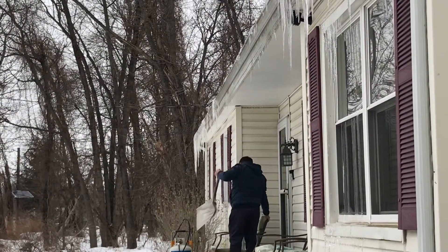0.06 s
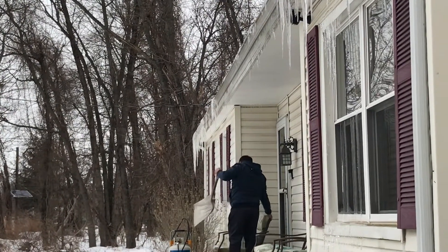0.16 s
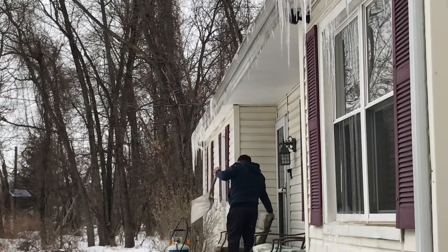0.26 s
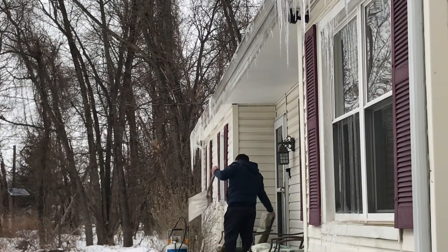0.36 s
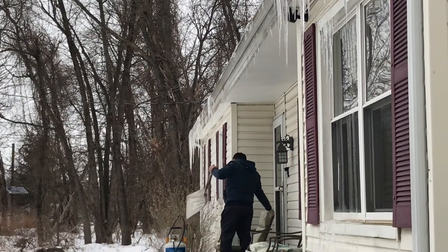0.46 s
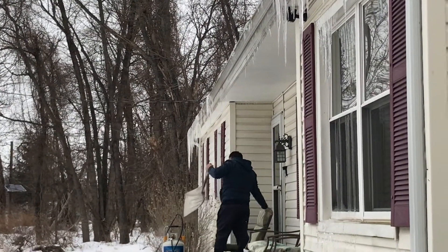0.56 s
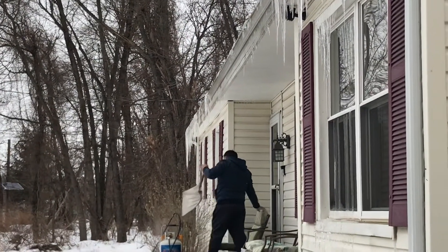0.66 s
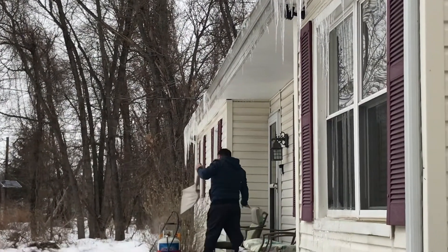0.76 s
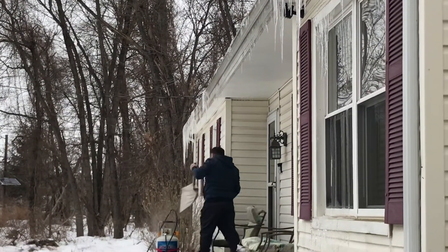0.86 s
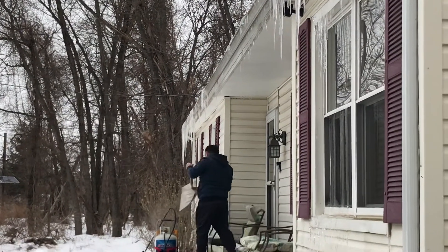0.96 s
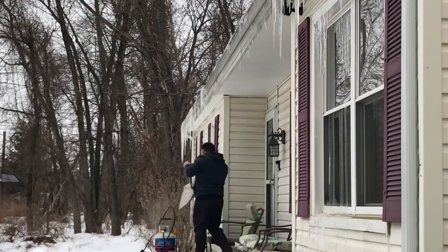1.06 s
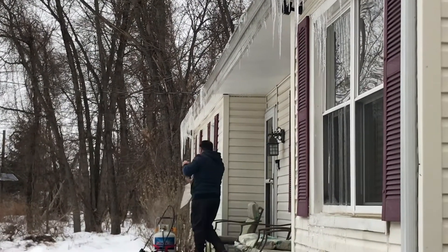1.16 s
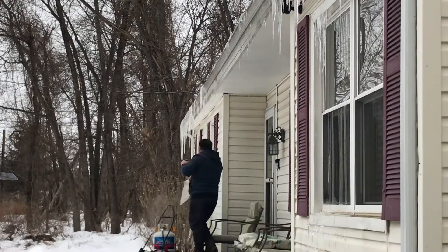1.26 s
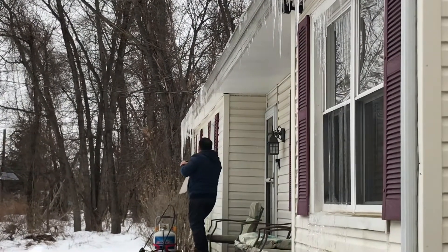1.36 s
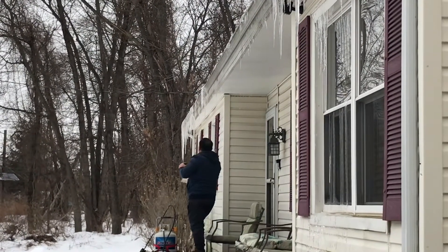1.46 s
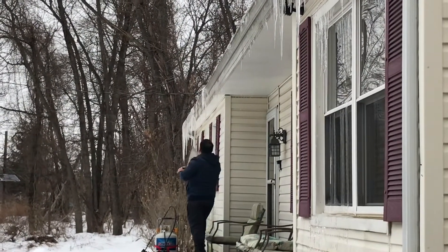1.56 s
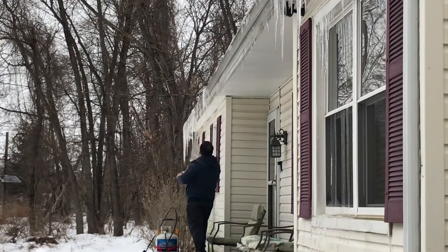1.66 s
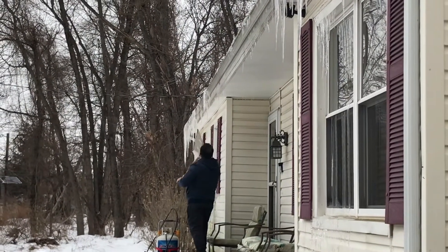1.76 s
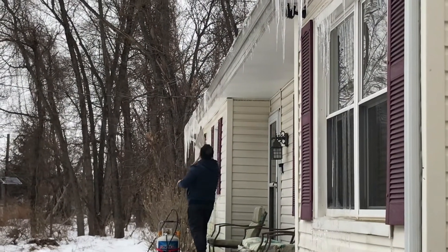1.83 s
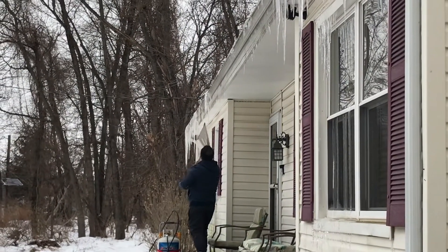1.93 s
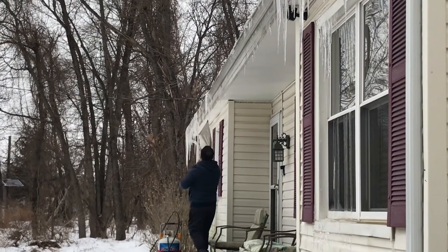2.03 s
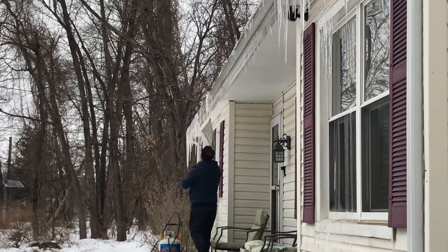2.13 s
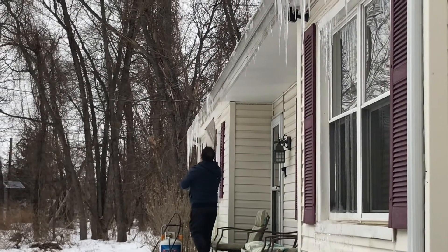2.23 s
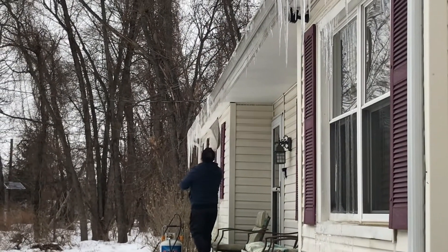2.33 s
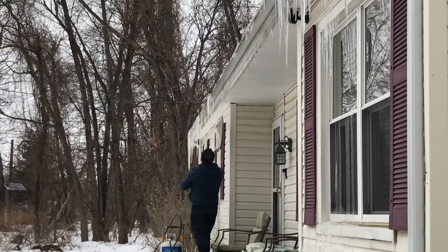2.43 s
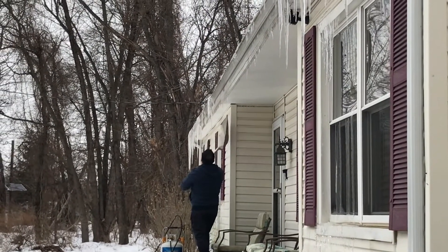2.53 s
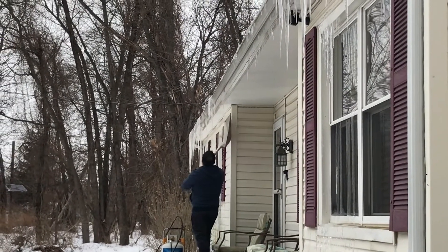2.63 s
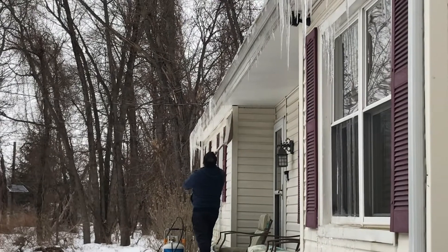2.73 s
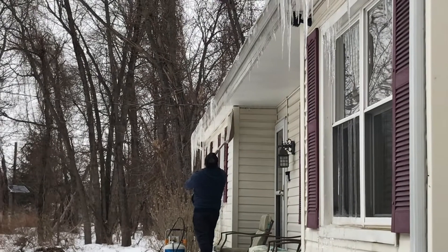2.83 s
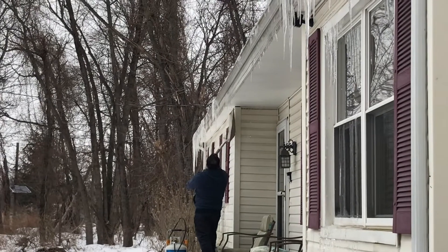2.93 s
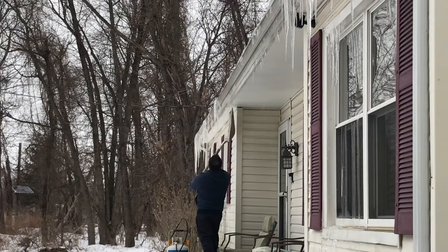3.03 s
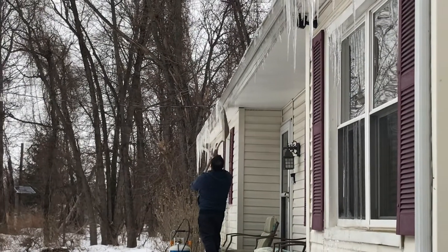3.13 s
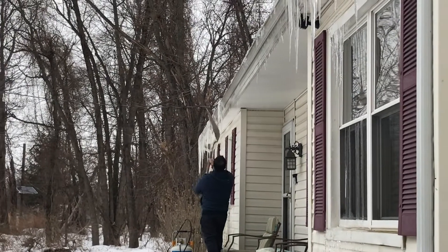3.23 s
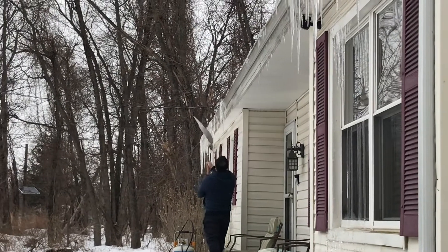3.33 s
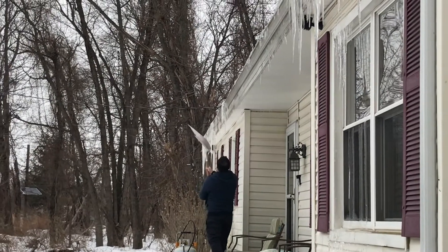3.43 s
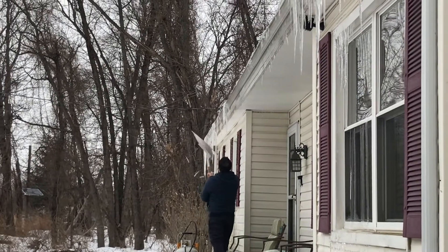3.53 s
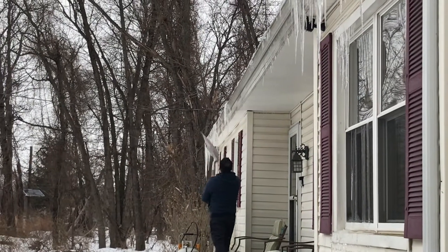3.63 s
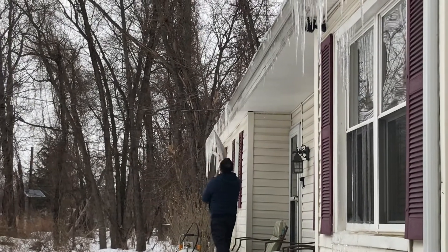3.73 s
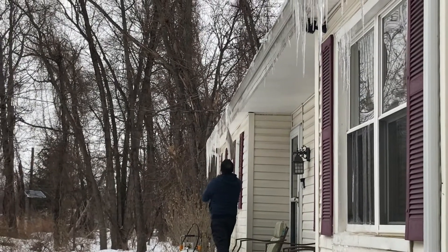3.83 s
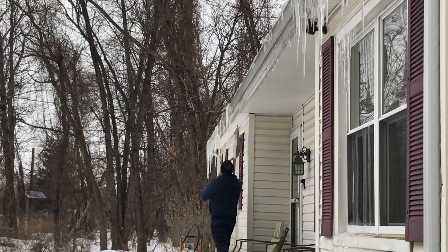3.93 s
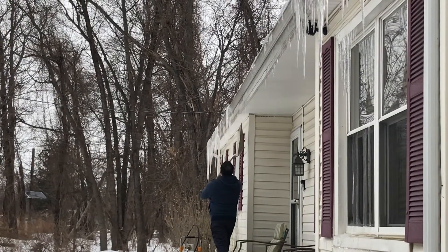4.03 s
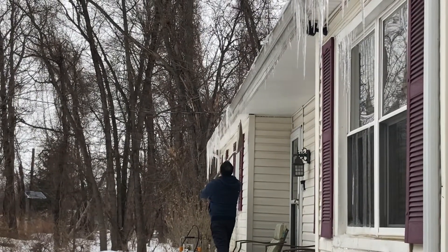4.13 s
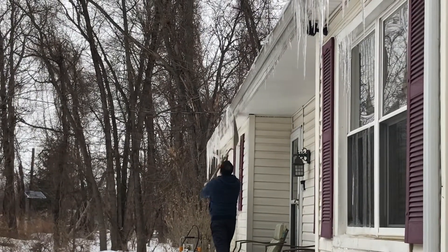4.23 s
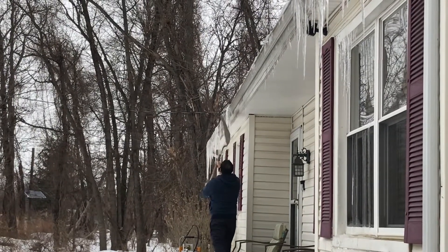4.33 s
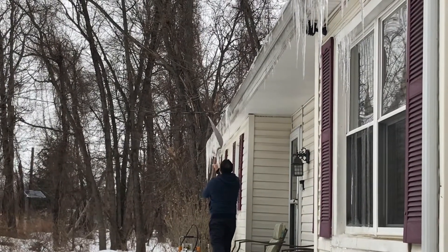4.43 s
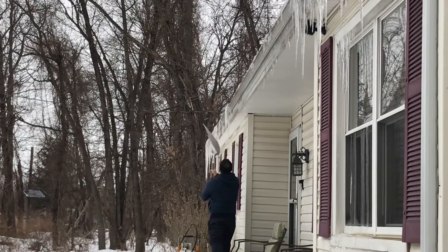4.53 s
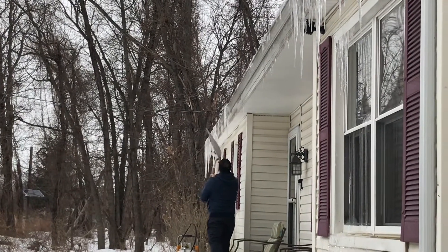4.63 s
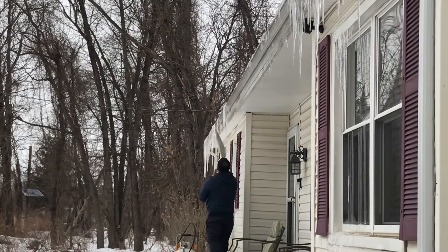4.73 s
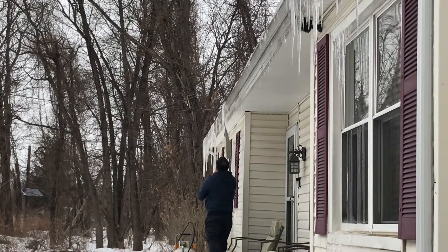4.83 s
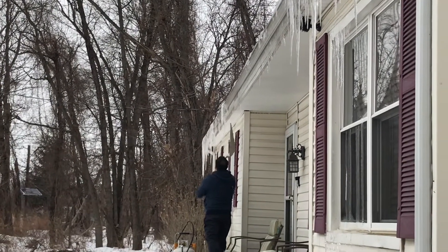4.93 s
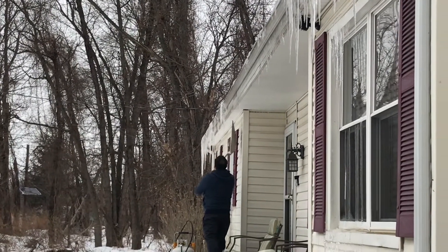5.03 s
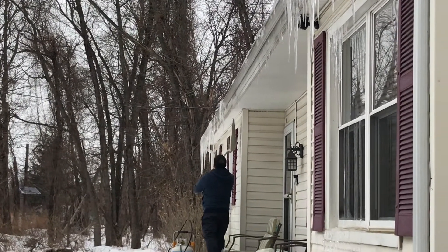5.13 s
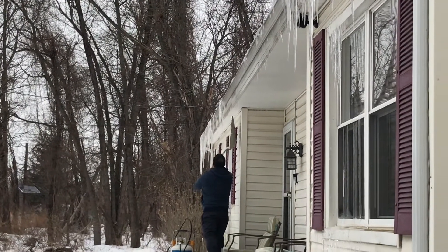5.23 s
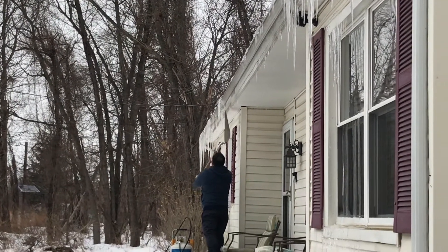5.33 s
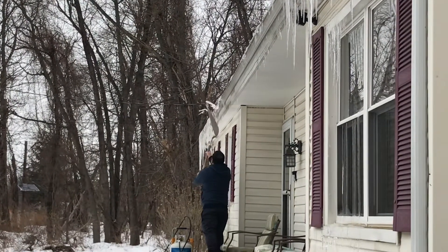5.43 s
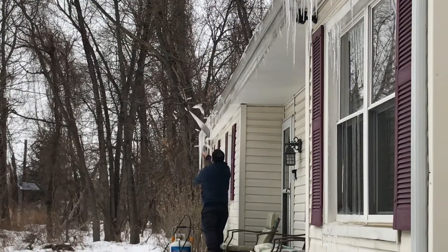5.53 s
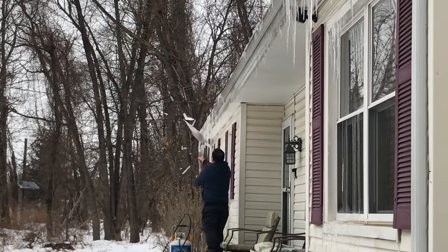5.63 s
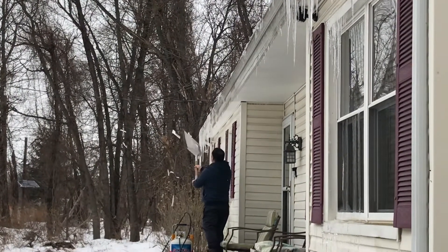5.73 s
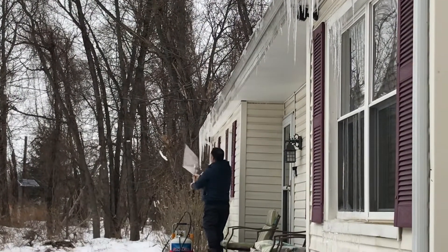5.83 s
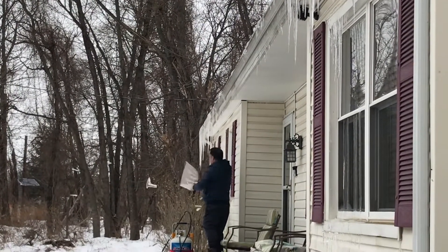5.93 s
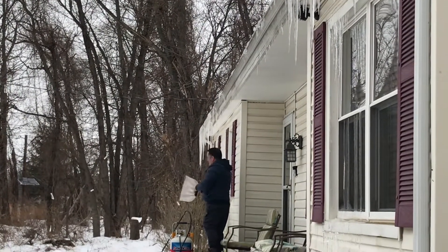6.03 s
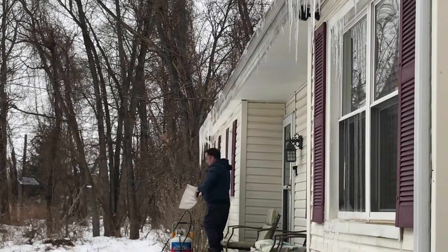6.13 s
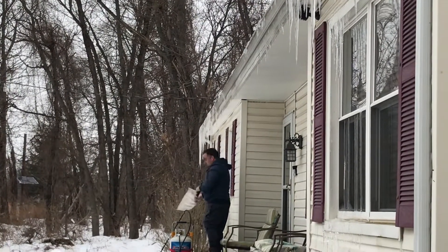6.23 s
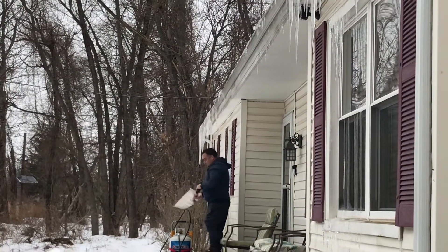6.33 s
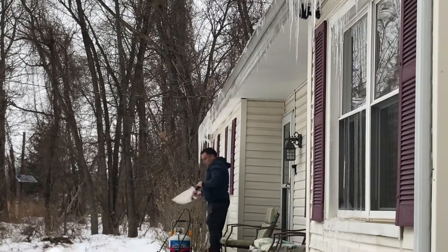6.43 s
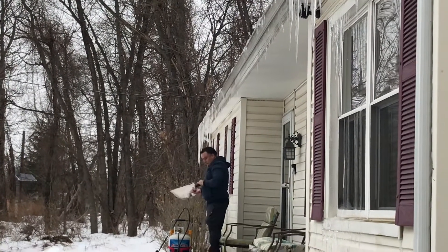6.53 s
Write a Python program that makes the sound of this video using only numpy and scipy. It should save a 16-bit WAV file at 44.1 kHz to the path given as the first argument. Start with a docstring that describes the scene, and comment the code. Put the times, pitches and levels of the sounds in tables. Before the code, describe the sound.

Handling rumble and gritty rubbing open the scene and stop quickly. Low air, faint distant road hum and tiny ice ticks remain. Some metres away, a shovel blade clanks against a gutter three times over about two seconds, snapping brittle icicles. The final sharp crash sends pieces tinkling and scattering, thinning to small clicks and crumbs. Single-channel outdoor pickup with slight reflections from the house wall.

```python
"""Something scuffs close to the microphone, then lets go: rough noise bands, crunches and squeaks.
Small cracks tick in the winter yard: short, sharp bursts of grainy noise.
A shovel strikes the eave three times: icicles snap as noise bursts with ringing rods, blade and gutter modes ring.
After the last strike shards clatter down, glancing off the blade in a shower of crumbs; the porch answers briefly.
Throughout, low yard air and a distant road hum as slowly wavering coloured noise."""
import sys
import numpy as np
from scipy import signal
from scipy.fft import rfft, irfft, next_fast_len
from scipy.io import wavfile
from scipy.ndimage import map_coordinates

SR = 44100
rng = np.random.default_rng(int(sys.argv[2]) if len(sys.argv) > 2 else 0)


def waveform_to_disk(signal):
    """Save audio, clipped to [-1, 1], as 16-bit WAV at the path in sys.argv[1]."""
    frames = np.transpose(np.atleast_2d(signal))
    scaled = np.clip(frames, -1, 1) * 32767
    samples = np.round(scaled).astype(np.int16)
    wavfile.write(sys.argv[1], SR, samples)


N = 289735  # length [samples]

# The shovel strikes the eave: (time [s], blade ring [dB], gutter ring [dB], gutter t60 [s])
STRIKES = [(3.022, -31, -38, 1.33), (4.206, -38.5, -46.5, 0.93), (5.326, -24, -29, 0.69)]
# Modes of the shovel blade: (frequency [Hz], relative level [dB], t60 [s])
BLADE_MODES = [(234, -14, 0.097), (296, -27.5, 0.51), (639, -21, 0.69), (752, -22.5, 0.74),
               (866, -14.5, 0.44), (932, -7, 0.24), (1056, -9, 0.4), (1078, -15, 0.23), (1316, -6, 0.33),
               (1416, -6, 0.29), (1546, -3.5, 0.33), (1613, -19, 0.42), (1886, -7.5, 0.19),
               (2000, -22, 0.19), (2300, -1, 0.21), (2493, 0.5, 0.25), (2735, -7, 0.29), (2570, -14, 0.21),
               (3250, -9.5, 0.16), (3210, -1.5, 0.15), (3470, -12.5, 0.17), (3880, -8, 0.16),
               (4070, -5, 0.18), (4870, -24, 0.093), (6540, 1, 0.1)]
# Modes of the gutter: (frequency [Hz], relative level [dB], multiplier on the strike's gutter t60 [ratio])
GUTTER_MODES = [(733, -16.5, 1.3), (1092, 0, 1.05)]

# Icicles snap off:
# (time [s], crack level [dB], centre [Hz], crumble t60 [s], rod pitch [Hz], rod ring [dB])
BREAKS = [(3.015, -24, 1930, 0.092, 2544, -24.5), (3.022, -20.5, 2170, 0.067, 2563, -20.5),
          (3.037, -30, 4060, 0.12, 1826, -25), (4.205, -25.5, 3430, 0.12, 1865, -33.5),
          (4.257, -31, 2850, 0.074, 2796, -33), (4.805, -23, 2400, .04, 2340, -24.5),
          (5.312, -16, 3220, 0.086, 2494, -22.5), (5.325, -15.5, 2870, .09, 1333, -21.5),
          (5.334, -18.5, 1960, 0.065, 1584, -26), (5.351, -20.5, 4770, 0.07, 1820, -25.5)]
# Loose pieces clatter down:
# (time [s], crack level [dB], centre [Hz], crumble t60 [s], rod pitch [Hz], rod ring [dB])
SHARDS = [(5.549, -37, 4000, .08, 2440, -44), (5.556, -28, 2600, 0.14, 2410, -30),
          (5.573, -25.5, 3030, 0.047, 3100, -29), (5.64, -31, 3540, 0.073, 2180, -42),
          (5.645, -26, 3020, 0.066, 1341, -33), (5.657, -28, 4200, 0.054, 2154, -32.5),
          (5.729, -27.5, 5030, 0.052, 4760, -25.5), (5.7619, -30, 2370, .07, 1723, -36),
          (5.835, -35.5, 2200, .1, 1700, -36), (6.094, -41.5, 2220, .06, 2235, -52)]
# Small cracks of ice and crusted snow: (time [s], level [dB], centre [Hz], crumble t60 [s])
TICKS = [(.959, -52, 5500, 0.026), (1.313, -53, 2880, 0.06), (2.279, -56, 7000, .035),
         (3.252, -53, 7000, .035), (3.394, -42, 3430, 0.09), (3.4855, -35.5, 1790, 0.01),
         (3.752, -42, 4000, 0.013), (3.762, -38, 4140, 0.033), (3.817, -27.5, 3700, 0.021),
         (3.920, -36, 1420, 0.074), (4.059, -41, 5500, 0.069), (4.1205, -35.5, 1670, 0.024),
         (4.544, -45.5, 3250, .028), (5.4695, -30, 3660, 0.073), (5.823, -37, 6500, 0.082),
         (5.931, -49, 5500, 0.042), (6.108, -51, 5500, .13), (6.186, -37.5, 4000, 0.025),
         (6.225, -56, 6000, 0.23)]
# Colour of an ice fracture: (frequency / centre frequency [ratio], gain [dB])
FRACTURE_COLOUR = [(.06, -24.5), (.17, -21.5), (.3, -8.5), (.5, -4.5), (1, 1.5), (1.6, -4.5), (3, -14.5),
                   (6, -28.5)]
# Treble colour of cracks at this distance: (frequency [Hz], gain [dB])
AIR_COLOUR = [(3200, 0), (4800, -2), (6500, 0), (8500, 1), (10500, -2), (13000, -0.5), (16000, -8.5)]
# Colour of the falling crumbs: (frequency [Hz], gain [dB])
CRUMB_COLOUR = [(900, -29), (1800, -6), (2600, 1), (4200, 7), (6800, -8), (9000, -24), (16000, -33)]

# The scuff presses harder, then lets go: (time [s], rumble before trim [dB], rubbing before trim [dB])
SCUFF_LEVELS = [(0, -47.5, -48.5), (.1, -51.5, -47), (.15, -57, -50.5), (.168, -47, -44.5),
                (.245, -49.5, -43.5), (.3, -43, -38), (.35, -58.5, -52.5), (.8, -100, -105)]
# Colour of the rubbing: (frequency [Hz], gain [dB])
RUB_COLOUR = [(400, -6.5), (600, -4.5), (950, 1), (1400, -4.5), (1950, -4), (2350, 7.5), (2850, -1.5),
              (3300, -7.5), (5400, -11.5), (6100, -3), (6800, -17.5), (10500, -17.5), (11500, -5),
              (12500, -35)]
# Colour of the handling rumble: (frequency [Hz], gain [dB])
RUMBLE_COLOUR = [(15, -42), (25, -30), (59, -0.5), (117, -11), (237, -1.5), (382, -7.5), (413, -19),
                 (600, -6), (780, -55), (1320, -120)]
# The scuff catches and crunches: (time [s], level [dB], centre [Hz], crumble t60 [s])
CRUNCHES = [(.159, -40.5, 3530, 0.055), (.254, -35, 2280, 0.06), (.266, -40, 1920, 0.2),
            (.2915, -34.5, 1950, 0.11), (.297, -40, 2320, 0.15)]
# The scuff sticks and slips: (time [s], pitch [Hz], level [dB], t60 [s])
SQUEAKS = [(.256, 2600, -36, 0.17), (.259, 3090, -30.5, 0.15), (.293, 2710, -28.5, 0.067)]

# Reverberation of wall and porch: (frequency [Hz], t60 [s])
PORCH_DECAY = [(300, 0.53), (1000, 0.43), (2800, 0.4), (7000, 0.22), (14000, 0.24)]
# Colour of the steady yard air: (frequency [Hz], gain [dB])
YARD_COLOUR = [(20, -36), (50, 1.5), (62, -3), (100, -3), (160, -6.5), (215, -4.5), (400, -12), (600, -16),
               (1400, -14), (2200, -23), (3200, -29.5), (5000, -34), (7000, -35), (16000, -39.5)]
# A far road: the tyre roar dips, then swells unevenly; the low drone is loudest at the start,
# fades, then partly returns: (time [s], tyre roar [dB], engine drone [dB])
TRAFFIC = [(0, -64, -49), (1.5, -68, -76.5), (3.1, -56, -79), (3.9, -58.5, -60.5), (6.57, -53.5, -63)]
# Colour of the tyre roar: (frequency [Hz], gain [dB])
ROAD_COLOUR = [(240, -61), (400, -13.5), (429, -35.5), (466, -47), (505, -9), (881, 2), (1430, -1),
               (2130, -6), (4500, -28.5), (5850, -53), (9900, -120)]
# Colour of the engine drone: (frequency [Hz], gain [dB])
DRONE_COLOUR = [(20, -23), (35, -1), (58, 4.5), (80, 2), (120, -19), (200, -40.5)]

GLANCE_DB = -15  # blade ring, relative to the level of a piece that glances off it
CRUMB_RISE_S, CRUMB_T60_S = 0.02, 0.62  # each shower of crumbs swells and thins out
# Fizz of a crack at CRISP_HZ, and its slope: smaller cracks are crisper
CRISP_DB, CRISP_HZ, CRISP_DB_PER_OCTAVE = -8, 3580, 22
# A sprinkle of still smaller cracks
FAINT_TICKS_PER_S, FAINT_TICK_DB, FAINT_TICK_HZ, FAINT_TICK_T60_S = 3.6, -63.5, 8000, 0.038
# A rod of pitch ROD_HZ rings ROD_LINGER times longer than it crumbles; higher ones fade sooner
ROD_LINGER, ROD_HZ = 2.1, 2000
OVAL_RATIO, OVAL_DB = 1.38, -4.5  # an oval rod's second bending mode: pitch ratio, level
TOP_HZ = 16000  # upper band limit


def amp(db):
    """Decibels to gain."""
    return 10 ** (np.asarray(db) / 20)


def unit(x):
    """Scale to rms 1."""
    return x / np.sqrt(np.mean(x ** 2) + 1e-20)


def along(points, hz):
    """Read (frequency, value) points on a log frequency axis."""
    point_hz, values = np.transpose(points)
    return np.interp(np.log(hz + 1e-6), np.log(point_hz), values)


def curves(rows):
    """One value per sample for each column after the time."""
    times, *columns = np.transpose(rows)
    return [np.interp(np.arange(N) / SR, times, column) for column in columns]


def wobble(rate):
    """A smooth random curve with rate knots a second."""
    knots = rng.standard_normal(int(N * rate / SR) + 4)
    return map_coordinates(knots, [np.arange(N) * rate / SR])


def filtered(x, response):
    """Shape the spectrum of x by a gain that depends on frequency."""
    size = next_fast_len(N + SR // 2)
    gain = response(np.fft.rfftfreq(size, 1 / SR))
    return irfft(rfft(x, size) * gain, size)[:N]


def noise(spectrum):
    """Coloured noise of rms 1."""
    white = rng.standard_normal(N)
    return unit(filtered(white, lambda hz: amp(along(spectrum, hz))))


def causal(response, size=2048):
    """The minimum-phase impulse response of a gain curve, energy 1."""
    cepstrum = irfft(np.log(response(np.fft.rfftfreq(size, 1 / SR)) + 1e-6))
    # Folding the cepstrum onto positive time packs the energy at the start
    cepstrum[1:size // 2] *= 2
    cepstrum[size // 2 + 1:] = 0
    impulse = irfft(np.exp(rfft(cepstrum)))
    return impulse / np.linalg.norm(impulse)


def add(track, s, sound):
    """Mix a sound into the track at time s."""
    start = max(round(s * SR), 0)
    track[start:start + len(sound)] += sound[:N - start]


def fade(t60, attack):
    """A fast rise and an exponential decay, one second long."""
    t = np.arange(SR) / SR
    return amp(-60 * t / t60) * (1 - np.exp(-t / attack))


def shovel():
    """Each strike rings the blade's modes and sets the gutter's modes singing."""
    out, singing = np.zeros(N), []
    for s, blade_db, gutter_db, t60 in STRIKES:
        add(out, s, amp(blade_db) * blade())
        for hz, mode_db, linger in GUTTER_MODES:
            singing.append((s, hz, gutter_db + mode_db, t60 * linger))
    return out + rings(singing, wet_db=-26.5, width_hz=0.81)


def blade(spread_db=2):
    """A sum of dying sheet-metal modes, at new strengths and phases for every contact."""
    t = np.arange(SR) / SR
    luck = rng.standard_normal(len(BLADE_MODES))
    phases = rng.uniform(0, 2 * np.pi, len(BLADE_MODES))
    out = np.zeros(SR)
    for (hz, db, t60), chance, phase in zip(BLADE_MODES, luck, phases):
        tone = np.sin(2 * np.pi * hz * t + phase)
        out += amp(db + spread_db * chance) * tone * fade(t60, 0.003)
    return out


def rings(rows, wet_db, width_hz):
    """Dying tones of struck or rubbed bodies; a random walk of the phase blurs the pitch by width_hz."""
    out, t = np.zeros(N), np.arange(SR) / SR
    for s, hz, db, t60 in rows:
        blur = np.cumsum(rng.standard_normal(SR)) * np.sqrt(2 * np.pi * width_hz / SR)
        tone = np.sin(2 * np.pi * hz * t + blur) * fade(t60, 0.0005)
        add(out, s, porch(amp(db) * tone, wet_db))
    return out


def breaking_ice():
    """Icicles snap off the roof edge: fractures, ringing rods and a shower of crumbs."""
    snaps = impacts(BREAKS, wet_db=-9.5, crisp_db=-23.5, attack=0.0009)
    return snaps + spray(BREAKS, share_db=-36.5)


def falling_ice():
    """Loose pieces clatter down as fractures, rods and crumbs, each glancing off the blade."""
    out = impacts(SHARDS, wet_db=-10.5, crisp_db=-28, attack=0.0012) + spray(SHARDS, share_db=-25)
    for s, db, *_ in SHARDS:
        add(out, s, amp(db + GLANCE_DB) * blade())
    return out


def impacts(rows, wet_db, crisp_db, attack):
    """Ice fractures, and the freed rod rings in its two bending planes."""
    out, modes = np.zeros(N), []
    for s, db, centre_hz, t60, rod_hz, rod_db in rows:
        crack = amp(db) * fracture(centre_hz, crisp_db, t60, attack=attack)
        add(out, s, porch(crack, wet_db))
        for hz, mode_db in [(rod_hz, 0), (OVAL_RATIO * rod_hz, OVAL_DB)]:
            ring_t60 = t60 * ROD_LINGER * ROD_HZ / hz
            modes.append((s, hz, rod_db + mode_db, ring_t60))
    return out + rings(modes, wet_db=-22, width_hz=12.2)


def fracture(centre_hz, crisp_db, t60, grain_db=3, attack=0.00027, ripple_db=3, ripple_hz=170):
    """A dying swarm of tiny cracks, coloured by the size of the piece; fine splinters add a flat fizz."""
    sizes = np.repeat(amp(grain_db * rng.standard_normal(SR)), 16)[:SR]  # a new size every 16 samples
    cracks = unit(sizes * rng.standard_normal(SR)) * fade(t60, attack)
    knots = rng.standard_normal(1024)

    def colour(hz):
        body = amp(along(FRACTURE_COLOUR, hz / centre_hz))
        fizz = amp(crisp_db) * hz / (hz + 700)
        # Every piece has its own resonances
        ripple = amp(ripple_db * map_coordinates(knots, [hz / ripple_hz], mode="mirror"))
        return np.hypot(body, fizz) * ripple * amp(along(AIR_COLOUR, hz))

    return signal.fftconvolve(cracks, causal(colour))[:SR]


def spray(rows, share_db, clump_db=3.5, grain_db=4):
    """Every impact sheds a shower of crumbs, clumpy grainy noise in proportion to its strength."""
    power = np.zeros(N)
    for s, db, *_ in rows:
        shower = amp(db + share_db) * fade(CRUMB_T60_S, CRUMB_RISE_S)
        add(power, s, shower ** 2)
    patter = unit(amp(grain_db * wobble(900)) * noise(CRUMB_COLOUR))
    return np.sqrt(power) * amp(clump_db * wobble(70)) * patter


def ticking_ice(spread_db=2):
    """Single clear cracks over a random sprinkle of faint ones."""
    chance = rng.random((round(FAINT_TICKS_PER_S * N / SR), 2))
    faint = []
    for when, size in chance:
        db = FAINT_TICK_DB + spread_db * (2 * size - 1)
        faint.append((when * N / SR, db, FAINT_TICK_HZ, FAINT_TICK_T60_S))
    return crackles(TICKS + faint, wet_db=-11)


def crackles(rows, wet_db, grain_db=1.5, attack=0.00039):
    """Small, sharp fractures with no ring; the smaller the piece, the more it fizzes."""
    out = np.zeros(N)
    for s, db, centre_hz, t60 in rows:
        crisp_db = CRISP_DB + CRISP_DB_PER_OCTAVE * np.log2(centre_hz / CRISP_HZ)
        crack = amp(db) * fracture(centre_hz, crisp_db, t60, grain_db=grain_db, attack=attack)
        add(out, s, porch(crack, wet_db))
    return out


def scuff(rub_db=-1, rumble_db=-1, grit_db=-13):
    """Rough rubbing near the microphone, with handling rumble, grit, a few crunches and squeaks."""
    low_db, high_db = curves(SCUFF_LEVELS)
    grip_db = 1.8 * wobble(60) + 1.5 * wobble(400)
    grit = unit(rng.standard_normal(N) * amp(4 * wobble(1500)))
    rubbing = amp(high_db + rub_db + grip_db) * (noise(RUB_COLOUR) + amp(grit_db) * grit)
    rumble = amp(low_db + rumble_db) * noise(RUMBLE_COLOUR)
    crunches = crackles(CRUNCHES, wet_db=-14)
    squeaks = rings(SQUEAKS, wet_db=-17, width_hz=38)
    return rubbing + rumble + crunches + squeaks


def porch(x, wet_db, rise_s=0.0019):
    """Add the answer of wall and porch: a swelling, dying noise tail with its own t60 at each frequency."""
    hz, t, grid = signal.stft(rng.standard_normal(SR // 2), SR, nperseg=256)
    decay = amp(-60 * t / along(PORCH_DECAY, hz)[:, None])
    rise = 1 - np.exp(-t / rise_s)
    tail = signal.istft(grid * decay * rise, SR, nperseg=256)[1]
    answer = signal.fftconvolve(x, tail / np.linalg.norm(tail))[:len(x)]
    return x + amp(wet_db) * answer


def outdoors(yard_db=-58, waver_db=1.04):
    """Low steady air, with the tyre roar and engine drone of a far road, all as coloured noise."""
    road_db, drone_db = curves(TRAFFIC)
    roar = amp(road_db + 1.1 * wobble(4.25)) * noise(ROAD_COLOUR)
    drone = amp(drone_db) * noise(DRONE_COLOUR)
    yard = amp(yard_db + waver_db * wobble(6)) * noise(YARD_COLOUR)
    return yard + roar + drone


def scene():
    """All sources at the microphone, as one channel."""
    ice = breaking_ice() + falling_ice() + ticking_ice()
    return (shovel() + ice + scuff() + outdoors())[None]


def record(dry):
    """A very steep low-pass removes what lies above the band limit."""
    return filtered(dry[0], lambda hz: 1 / np.sqrt(1 + (hz / TOP_HZ) ** 200))[None]


dry = scene()
out = record(dry)
waveform_to_disk(out)
```